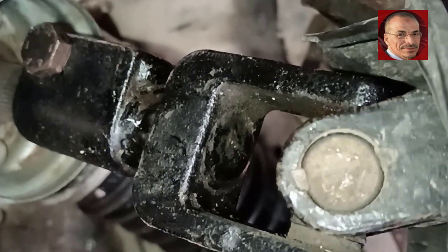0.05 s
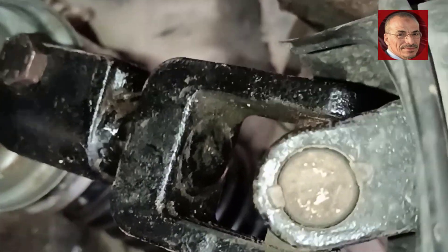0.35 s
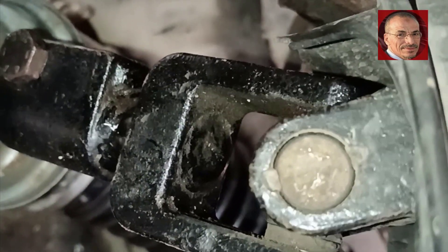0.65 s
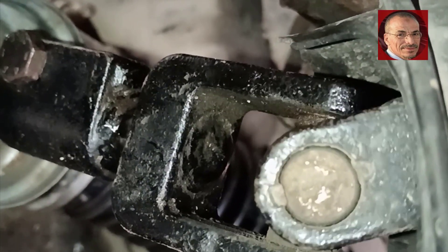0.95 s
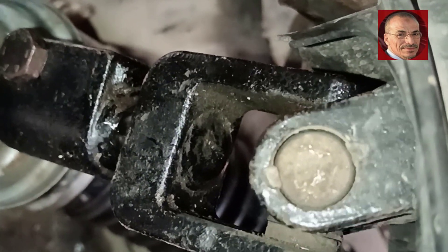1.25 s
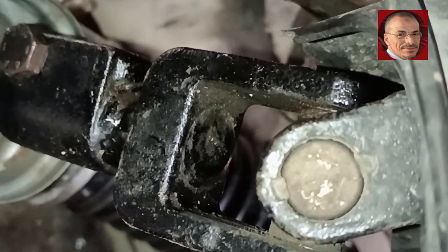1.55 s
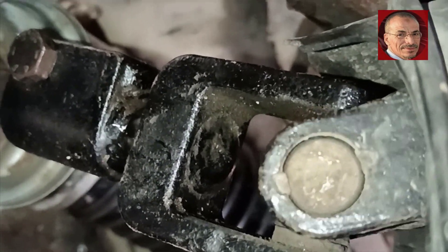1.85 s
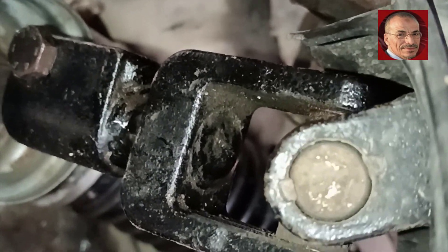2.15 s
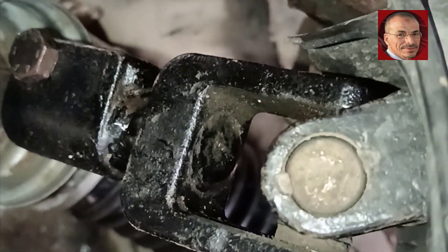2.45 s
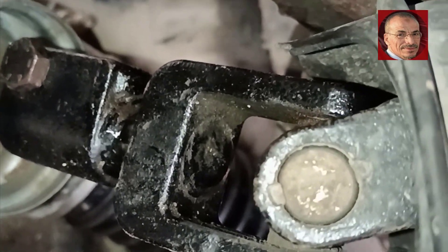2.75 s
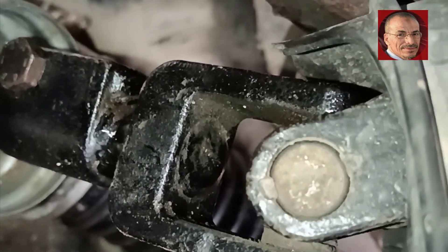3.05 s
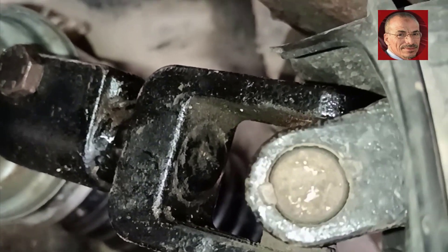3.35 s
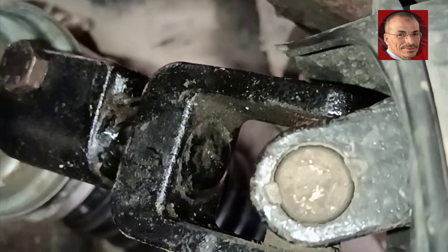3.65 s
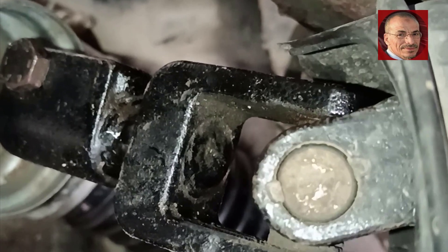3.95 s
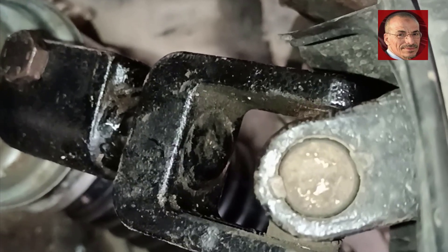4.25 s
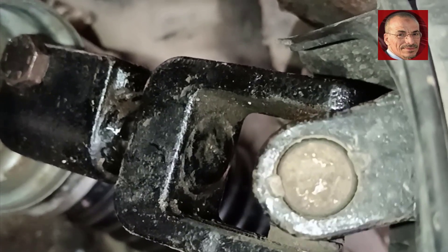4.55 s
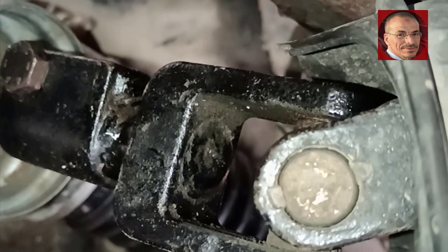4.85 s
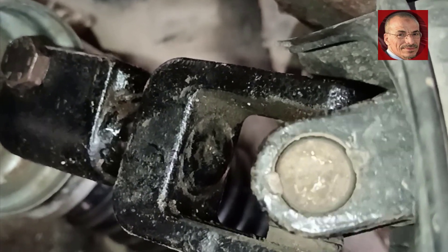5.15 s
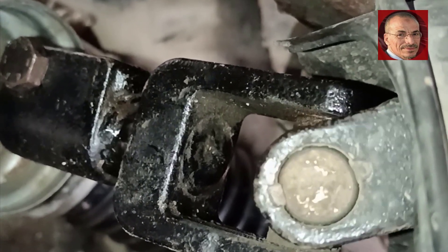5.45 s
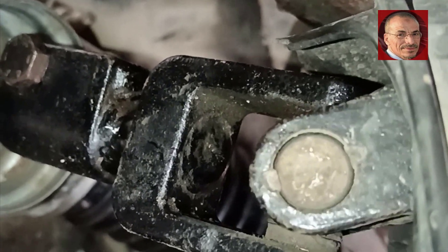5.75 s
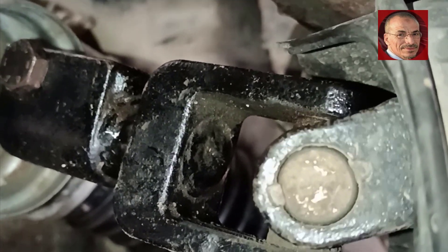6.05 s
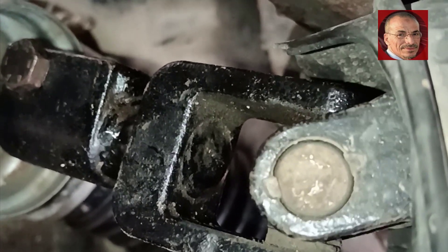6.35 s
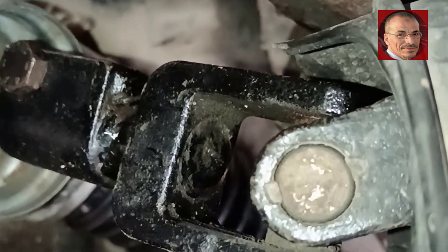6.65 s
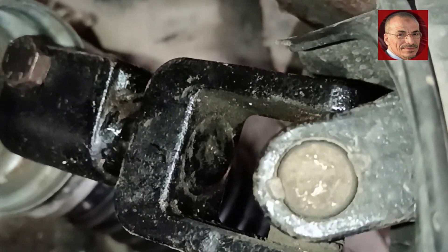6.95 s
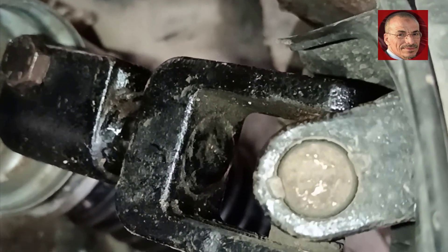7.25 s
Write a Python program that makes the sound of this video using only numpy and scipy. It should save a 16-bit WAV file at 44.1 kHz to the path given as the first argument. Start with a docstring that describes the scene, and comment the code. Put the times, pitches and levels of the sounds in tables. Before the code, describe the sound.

A worn steering joint knocks, thumps and rattles irregularly as it turns back and forth, with metal clicks and hiss over an idling engine.

```python
"""In a workshop, a stereo microphone close to a worn steering joint, the engine idling behind it.
Each turn of the wheel closes the slack with a hard knock, a thump and a loose rattle, ringing the
column and panels; then the steering hisses and faintly squeaks under load. Each turn back lands with
a soft double knock. Metal clicks now and then, and something brushes the right microphone port.
Steady room air and a very faint electrical whine lie underneath."""
import sys
import numpy as np
from scipy import signal
from scipy.fft import rfft, irfft
from scipy.io import wavfile

SR = 44100
rng = np.random.default_rng(int(sys.argv[2]) if len(sys.argv) > 2 else 0)


def materialize(psi):
    """Save the field psi as 16-bit PCM at rate SR to the path in sys.argv[1].

    A 1-D psi becomes a single channel; in a 2-D psi each row is a channel.
    """
    bounded = np.clip(np.atleast_2d(psi).T, -1, 1)
    quanta = np.round(bounded * 32767).astype(np.int16)
    wavfile.write(sys.argv[1], SR, quanta)


N = 326340


def amp(db):
    return 10 ** (np.asarray(db) / 20)

def unit_rms(x):
    return x / np.sqrt(np.mean(x ** 2) + 1e-20)

def decay(t, t60):
    return np.exp(-np.log(1000) * t / t60)

def spectrum_at(points, hz):
    """A spectrum joined by straight lines on a log-frequency axis."""
    f, value = np.transpose(points)
    return np.interp(np.log(hz + 1), np.log(f + 1), value)

def curve(rows):
    """A control curve at every sample."""
    return np.interp(np.arange(N) / SR, *np.transpose(rows))

def add(mix, start_s, sound):
    part = mix[..., max(round(start_s * SR), 0):][..., :sound.shape[-1]]
    part += sound[..., :part.shape[-1]]

def drift(rate_hz):
    """A smooth random wander of unit size."""
    hz = np.fft.rfftfreq(N, 1 / SR)
    return unit_rms(irfft(rfft(rng.standard_normal(N)) * np.exp(-(hz / rate_hz) ** 2), N))

def lowpass(x, hz):
    return signal.sosfilt(signal.butter(2, hz, fs=SR, output="sos"), x)

def highpass(x, hz, order):
    return signal.sosfilt(signal.butter(order, hz, "high", fs=SR, output="sos"), x)

def eased(x, rise_s):
    """The sound builds up gradually from its start."""
    return x * (1 - np.exp(-np.arange(x.shape[-1]) / SR / rise_s))

def swell(start_s, attack_s, hold_s, release_s):
    """Effort builds smoothly, holds and lets go."""
    t = np.arange(N) / SR - start_s
    rise = np.sin(np.pi / 2 * np.clip(t / attack_s, 0, 1)) ** 2
    return rise * np.exp(-np.maximum(t - attack_s - hold_s, 0) / release_s)

# Likeness of the microphone's left and right ports: (frequency [Hz], correlation [0-1])
PORT_LIKENESS = [(60, 0.6), (150, .93), (300, .8), (500, .75), (800, 0.08), (1200, 0), (3000, .05),
                 (14000, 0)]
def noise(colour, size=N):
    """Coloured noise of unit size at the two ports, alike in the bass and unrelated in the treble."""
    hz = np.fft.rfftfreq(size, 1 / SR)
    left, unrelated = rfft(rng.standard_normal((2, size)))
    likeness = spectrum_at(PORT_LIKENESS, hz)
    right = likeness * left + np.sqrt(1 - likeness ** 2) * unrelated
    return unit_rms(irfft(np.array([left, right]) * amp(spectrum_at(colour, hz)), size))

# The engine idling behind the joint: (time [s], firing rate [Hz])
IDLE_RATE = [(0, 27.41), (0.8, 27.8), (1.6, 26.98), (2.3, 27.52), (2.8, 27.24), (3.5, 27.42), (4.3, 28),
             (5.2, 27.35), (6.2, 27.49), (7, 27.15), (7.4, 27.38)]
# Its hum; the second order booms in the cabin: (order [x firing rate], relative level [dB])
FIRING_ORDERS = [(1, -21.5), (2, 3.5), (3, -9.5), (4, -18), (5, -17.5), (6, -40), (7, -36), (8, -44),
                 (9, -31)]
# Its rumble: (frequency [Hz], relative density [dB])
RUMBLE_COLOUR = [(15, -5.5), (40, 5), (80, 4.5), (140, -7), (200, -5), (330, -22), (430, -16.5), (620, -33),
                 (780, -28), (1200, -55), (3000, -57)]
def engine(hum_db=-13, rumble_db=-26.5, odd_dip_db=-9):
    """Firing orders hum, their lopsided beat evening out under load; rumble throbs with the crank."""
    firings = np.cumsum(curve(IDLE_RATE)) / SR
    hiss_gain, _ = steering_load()
    effort = (hiss_gain - hiss_gain.min()) / np.ptp(hiss_gain)
    hum = np.zeros(N)
    for order, db in FIRING_ORDERS:
        waver_db = 1.02 if db > -6 else 3  # the boom is steadier than the weak orders
        level_db = db + waver_db * drift(16) + order % 2 * odd_dip_db * effort
        hum += amp(level_db) * np.cos(2 * np.pi * order * firings)
    throb = 1 + 0.036 * np.cos(3 * np.pi * firings)
    return amp(hum_db) * unit_rms(hum) + amp(rumble_db) * noise(RUMBLE_COLOUR) * throb

# Room tone around the microphone: (frequency [Hz], relative density [dB])
AIR_COLOUR = [(500, -6.5), (1100, 2.5), (2000, -2), (3200, -1), (4400, -14.5), (5600, -14), (7500, -8.5),
              (10000, -24), (12500, -15.5), (15000, -22)]
def workshop_air(level_db=-62.5):
    """The air of the room is a faint, steady noise."""
    return amp(level_db) * noise(AIR_COLOUR)

# Steering noise that lasts between the turns: (time [s], relative level [dB])
LASTING_LEVEL = [(0, -57), (0.9, -58), (1.2, -59), (2.6, -62), (3.6, -62.5), (3.95, -61), (4.7, -64.5),
                 (5.4, -58), (7.4, -59)]
def steering_load(lasting_hiss_db=-4.5):
    """Gains of hiss and rush: every hard turn adds a swell of power to what lasts."""
    lasting = amp(curve(LASTING_LEVEL))
    hiss_power, rush_power = (amp(lasting_hiss_db) * lasting) ** 2, lasting ** 2
    for s, *_, hiss_db, rush_db in HARD_TURNS:
        hiss_power += (amp(hiss_db) * swell(s, attack_s=0.17, hold_s=0.04, release_s=0.12)) ** 2
        rush_power += (amp(rush_db) * swell(s, attack_s=0.013, hold_s=0.22, release_s=0.18)) ** 2
    return np.sqrt(hiss_power), np.sqrt(rush_power)

# Narrow, bright hiss of the steering, close by: (frequency [Hz], relative density [dB])
HISS_COLOUR = [(1500, -15.5), (3000, -3.5), (3950, 2), (4500, -1.5), (5100, 0.5), (5650, 1.5), (6800, -9),
               (9500, -25), (14000, -20.5)]
# The broader rush below it: (frequency [Hz], relative density [dB])
RUSH_COLOUR = [(200, 2), (500, 6.5), (900, -0.5), (1300, -2.5), (1650, 0), (2300, -3), (3200, -3),
               (4500, -17.5), (8000, -28.5)]
def steering(hiss_db=3, rush_db=5.5, groan_db=30.5, flutter_db=1.5):
    """Hiss and rush rise with effort on the wheel, and the loaded linkage groans."""
    hiss_gain, rush_gain = steering_load()
    hiss = amp(hiss_db + flutter_db * drift(25)) * noise(HISS_COLOUR)
    rush = amp(rush_db) * noise(RUSH_COLOUR)
    # (frequency [Hz], relative density [dB])
    groan_colour = [(30, -16), (75, 5.5), (150, 2.5), (260, -14.5), (500, -27.5), (1000, -32),
                    (3000, -64)]
    groan = amp(groan_db) * noise(groan_colour)
    return hiss_gain * (hiss + groan) + rush_gain * rush

# A whine in the background: (time [s], level [dB])
WHINE_FADE = [(0, -80), (4.5, -81), (4.6, -96.5), (7.4, -95.5)]
def whine(hz=15000, waver_db=4):
    """A very faint, high electrical tone wavers and drops away partway through."""
    tone = np.sin(2 * np.pi * hz * np.arange(N) / SR)
    return amp(curve(WHINE_FADE) + waver_db * drift(4)) * tone

# Light metal clicks: (time [s], snap [dB], ring [dB], ring t60 [s], low cut [Hz])
METAL_CLICKS = [(0.001, -26, -37.5, 0.28, 3000), (0.3608, -42, -64, 0.22, 3000),
                (0.8193, -37, -41.5, 0.1, 3800), (1.639, -30.5, -41, 0.14, 4600),
                (2.019, -50, -57, 0.076, 2000), (4.9095, -42.5, -63.5, 0.087, 1500),
                (5.298, -43, -38, 0.2, 2200), (5.3247, -31, -31.5, 0.092, 2930)]
# The noise in a click: (frequency [Hz], relative density [dB])
METAL_COLOUR = [(800, -24.5), (2500, -4), (3700, -7), (4500, -6), (5150, -1.5), (5900, -5.5), (7200, -17.5),
                (10000, -23.5), (12000, -19), (15000, -30.5)]
# The tones that ring in it: (frequency [Hz], relative level [dB])
METAL_MODES = [(5140, -3), (5470, -5), (5615, -0.5), (6297, -4), (6848, -9), (7552, -13)]
def clicks(snap_t60=0.017, tones_db=-9):
    """A bright snap of metal, then a short ring that blends with the room."""
    out, t = np.zeros((2, N)), np.arange(SR // 2) / SR
    for s, snap_db, ring_db, t60, low_hz in METAL_CLICKS:
        tones = sum(amp(db) * np.sin(2 * np.pi * (hz * t + rng.random((2, 1))))
                    for hz, db in METAL_MODES)
        metal = unit_rms(noise(METAL_COLOUR, len(t)) + amp(tones_db) * tones)
        metal = highpass(eased(metal, rise_s=0.00075), low_hz, order=3)
        add(out, s, metal * (amp(snap_db) * decay(t, snap_t60) + amp(ring_db) * decay(t, t60)))
    return out

# Modes of the steering column and body: (frequency [Hz], relative level [dB], t60 [s])
BODY_MODES = [(76.1, -10, .17), (138, -5, 0.15), (174.5, -11, .14), (199.2, -24, .2), (270.8, -19, .12),
              (327.3, -19, 0.12), (339, -10, .027), (444, -17.5, 0.059), (511, -24.5, 0.086),
              (559, -27.5, .06), (660, -34, .1), (781, -38.5, 0.073), (880, -38, .045), (1067, -44, 0.11),
              (1130, -46, .08), (1470, -45, 0.051), (1633, -47.5, 0.093), (1840, -52.5, 0.075)]
# Dense ringing of panels and trim: (frequency [Hz], relative density [dB])
PANEL_COLOUR = [(50, -10.5), (130, -6), (250, 0.5), (450, -7.5), (720, -16), (950, -20), (1300, -25),
                (1650, -25.5), (2100, -32), (2900, -47), (5000, -51.5), (12000, -62.5)]
def struck_body(panel_db, panel_t60, panel_rise_s, rise_cycles=0.36):
    """Neighbouring modes move the far end in opposite senses, so a thud swells before it dies."""
    t = np.arange(SR // 2) / SR
    ring = np.zeros(len(t))
    for k, (hz, db, t60) in enumerate(BODY_MODES):
        mode = amp(db) * decay(t, t60) * np.sin(2 * np.pi * hz * t)
        ring += (-1) ** k * eased(mode, rise_cycles / hz)
    panels = amp(panel_db) * noise(PANEL_COLOUR, len(t)) * decay(t, panel_t60)
    return eased(panels, panel_rise_s) - ring

def light_contact(low_hz, high_hz, t60):
    """A light contact stirs mostly the panels, with little bass."""
    ring = struck_body(panel_db=-15.5, panel_t60=t60, panel_rise_s=0.0019)
    return lowpass(highpass(ring, low_hz, order=1), high_hz)

def blow():
    """A hard, dry contact rings the body; the well-damped panels differ a little each time."""
    return struck_body(panel_db=-23.5, panel_t60=0.1, panel_rise_s=0.0005)

# Turns back to the soft flank, close by:
# (time [s], knock gain [dB], thump delay [s], thump gain [dB], thump bandwidth [Hz])
SOFT_RETURNS = [(0.084, -8, 0.036, 2.5, 62.2), (0.888, -9.5, .037, 3.5, 66.5),
                (1.714, -8.5, .023, -6.5, 125.7), (3.323, -15, 0.028, -2.5, 160),
                (5.347, -8.5, 0.0295, 1, 85.4), (6.138, -8.5, 0.02823, 14.5, 56.9),
                (6.996, -9.5, 0.051, 11.5, 52.5)]
def soft_knocks(graze_db=4.5, landing_db=4, landing_s=0.021):
    """The joint grazes the soft flank, then lands; the linkage thumps as it takes up the load."""
    out = np.zeros((2, N))
    for s, db, thump_s, thump_db, thump_hz in SOFT_RETURNS:
        graze = eased(light_contact(low_hz=150, high_hz=720, t60=0.075), rise_s=0.012)
        landing = eased(light_contact(low_hz=170, high_hz=624, t60=0.13), rise_s=0.0026)
        add(out, s, amp(db + graze_db) * graze)
        add(out, s + landing_s, amp(db + landing_db) * landing)
        add(out, s + thump_s, amp(thump_db) * lowpass(blow(), thump_hz))
    return out

# Touches on the microphone itself, at the right port:
# (time [s], push [dB], swing [Hz], slip time [s], tick [dB], tick pitch [Hz])
PORT_TOUCHES = [(0.399, 5, 66, 0.0017, -42, 1400), (3.7717, 0.5, 200, 0.0005, -11, 2360),
                (3.8204, 2, 247, 0.00086, -20.5, 1590), (3.8327, -9, 150, 0.00048, -41, 2770),
                (3.847, -8.5, 130, 0.00058, -42, 2800), (3.8715, 11.5, 62, 0.0014, -27, 2600)]
def touches(scratch_db=-18, left_leak_db=-39, drag_cycles=0.16, swing_cycles=0.59, tick_cycles=0.65):
    """A touch drags, then lets go with a tick and a scratch; air in the port swings once and settles."""
    right, t = np.zeros(N), np.arange(-SR // 50, SR // 25) / SR
    width_cycles = np.where(t < 0, drag_cycles, swing_cycles)  # the touch lets go at t = 0
    for s, push_db, swing_hz, slip_s, tick_db, tick_hz in PORT_TOUCHES:
        cycles = t * swing_hz
        push = np.tanh(t / slip_s) * np.cos(2 * np.pi * cycles) * np.exp(-(cycles / width_cycles) ** 2)
        tick = np.sin(2 * np.pi * tick_hz * t) * np.exp(-(t * tick_hz / tick_cycles) ** 2)
        friction = unit_rms(lowpass(rng.standard_normal(len(t)), hz=3000))
        scratch = amp(scratch_db) * friction * (t >= 0) * decay(abs(t), t60=0.039)
        add(right, s + t[0], amp(push_db) * push + amp(tick_db) * (tick + scratch))
    return np.array([amp(left_leak_db) * right, right])

# Turns against the hard flank, close by:
# (time [s], knock gain [dB], thump delay [s], thump gain [dB], hiss gain [dB], rush gain [dB])
HARD_TURNS = [(0.437, 0.5, .05, 3, -59, -58.5), (1.2855, 1, 0.064, 6.5, -63.5, -61.5),
              (2.923, -1.5, .05, -8, -64.5, -60), (4.925, -0.5, 0.0585, 7.5, -58, -62.5),
              (5.741, -0.1, .065, 9, -61.5, -61), (6.572, 0.5, .07, 11, -61, -60)]
def hard_knocks(bounce_s=0.0163, bounce_db=-8.5, rebound_s=0.022, rebound_db=9):
    """The slack closes hard, bounces, rebounds and rattles; the linkage thumps as it takes the load."""
    out = np.zeros((2, N))
    for s, db, thump_s, thump_db, *_ in HARD_TURNS:
        knock = blow()
        # slower contacts excite less treble
        bounce = lowpass(knock, hz=1390)
        rebound = lowpass(lowpass(knock, hz=82), hz=332)
        thump = lowpass(knock, hz=65)
        add(out, s, amp(db) * knock)
        add(out, s + bounce_s, amp(db + bounce_db) * bounce)
        add(out, s + rebound_s, amp(db + rebound_db) * rebound)
        add(out, s, amp(db) * rattle())
        add(out, s + thump_s, amp(thump_db) * thump)
    return out

def rattle(count=4, start_s=0.043, gap_s=0.036, jitter_s=0.008, gain_db=-17, fall_db_per_s=31.5):
    """Loose parts settle in a few uneven, fading contacts."""
    out = np.zeros((2, SR))
    for s in np.arange(count) * gap_s + jitter_s * rng.uniform(-1, 1, count):
        contact = light_contact(low_hz=150, high_hz=900, t60=0.14)
        add(out, start_s + s, amp(gain_db - fall_db_per_s * s) * contact)
    return out

# Lone bumps in the linkage: (time [s], gain [dB], contact bandwidth [Hz])
LINKAGE_BUMPS = [(0.513, -13.5, 1480), (1.619, -7.5, 140), (2.993, -17, 797), (5.808, -13.5, 1100),
                 (6.684, -17, 700)]
def bumps():
    """Single blows ring the body; the slower the contact, the duller the bump."""
    out = np.zeros((2, N))
    for s, db, hz in LINKAGE_BUMPS:
        add(out, s, amp(db) * lowpass(blow(), hz))
    return out

# Squeaks at the joint, faint even this close: (time [s], level [dB])
JOINT_SQUEAKS = [(0.6, -57.5), (1.49, -60.5), (1.97, -67), (3.06, -64), (5.07, -62.5), (5.851, -62),
                 (6.72, -62.5)]
def squeaks(pitch_hz=3870, width_hz=150, wander=0.014):
    """The loaded joint rubs with a fuzzy, wandering whistle, mostly just after a hard knock."""
    cycles = np.cumsum(pitch_hz * (1 + wander * drift(8.3))) / SR
    fuzz = np.array([drift(width_hz), drift(width_hz)])
    whistle = unit_rms(fuzz * np.sin(2 * np.pi * cycles))
    return whistle * sum(amp(db) * swell(s, attack_s=0.046, hold_s=0.06, release_s=0.046)
                         for s, db in JOINT_SQUEAKS)

# At the microphone, right port over left: (frequency [Hz], level [dB])
RIGHT_EXCESS = [(60, 6.2), (110, 5), (200, 3.8), (400, 3.4), (700, 2), (2400, 2.8), (6000, 2.2), (12000, 0)]
# Left port ahead of right: (frequency [Hz], phase [rad])
LEFT_LEAD = [(0, 0), (15, .7), (80, .66), (160, .46), (400, .6), (800, .1), (2000, 0)]
def microphone_ports(x, pad=8192):
    """Sound arrives louder at the right port, with the bass a little earlier at the left."""
    left, right = rfft(np.pad(x, ((0, 0), (pad, pad)), "reflect"))
    hz = np.fft.rfftfreq(N + 2 * pad, 1 / SR)
    ratio = amp(spectrum_at(RIGHT_EXCESS, hz))
    half_lead = np.exp(0.5j * spectrum_at(LEFT_LEAD, hz))
    pair = np.array([left * half_lead, right * ratio / half_lead]) * 2 / (1 + ratio)
    return irfft(pair, N + 2 * pad)[:, pad:-pad]

def scene():
    """The workshop and the joint reach both ports; the touches land on the microphone itself."""
    bed = engine() + workshop_air() + steering() + whine()
    events = clicks() + soft_knocks() + hard_knocks() + bumps() + squeaks()
    return microphone_ports(bed + events) + touches()

def record(dry, fade_s=0.0032, edge_hz=15400):
    """The loudest peaks overload at full scale; the ends fade and the top treble is cut."""
    clipped = dry / (1 + dry ** 16) ** (1 / 16)
    faded = clipped * signal.windows.tukey(N, 2 * fade_s * SR / N)
    band_limit = signal.firwin(511, edge_hz, window=("kaiser", 9), fs=SR)
    return signal.oaconvolve(faded, band_limit[None], "same")

dry = scene()
out = record(dry)
materialize(out)
```